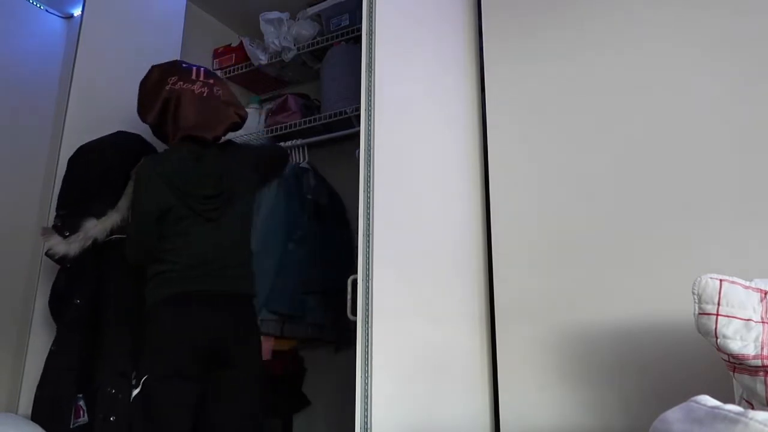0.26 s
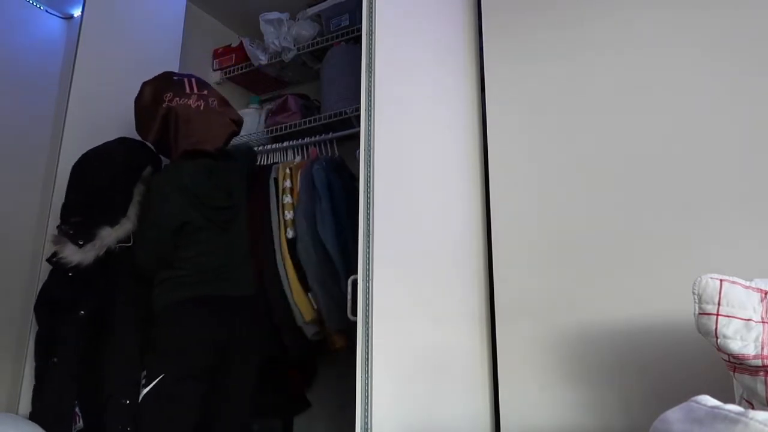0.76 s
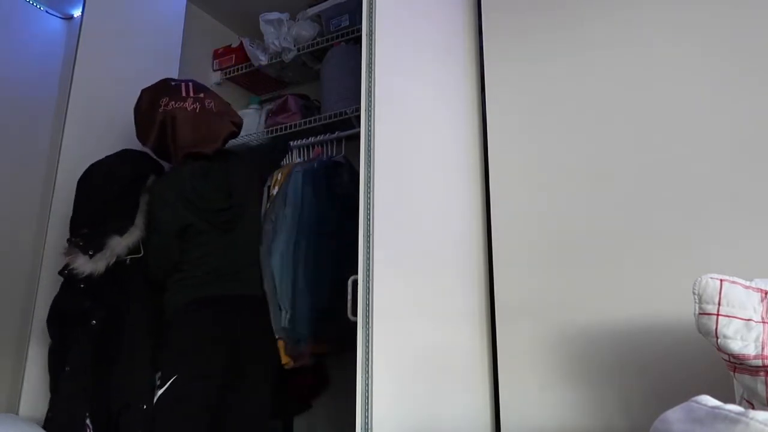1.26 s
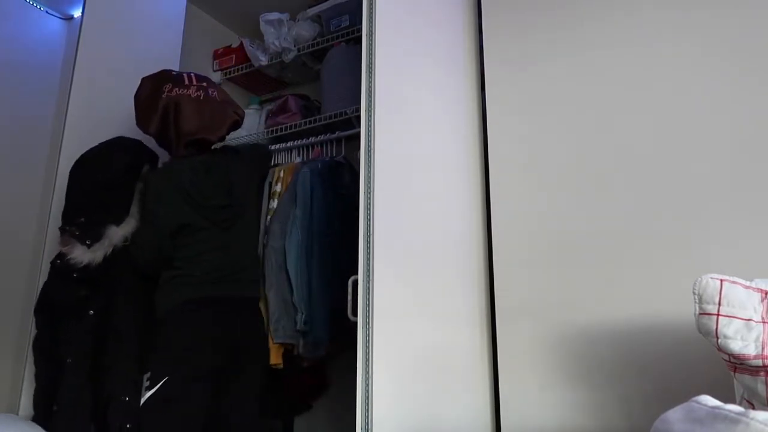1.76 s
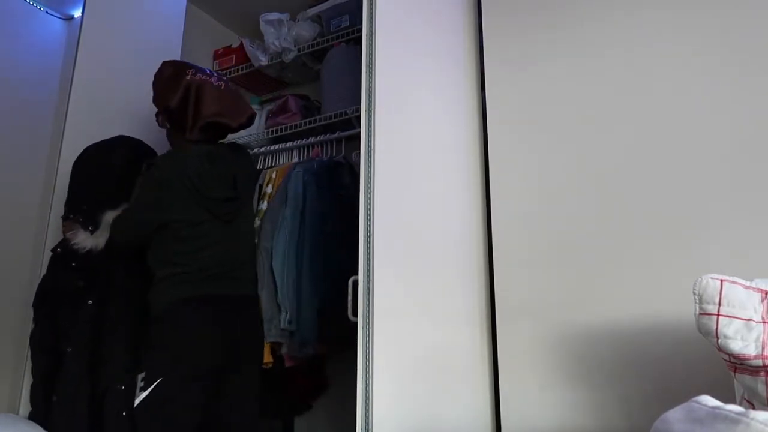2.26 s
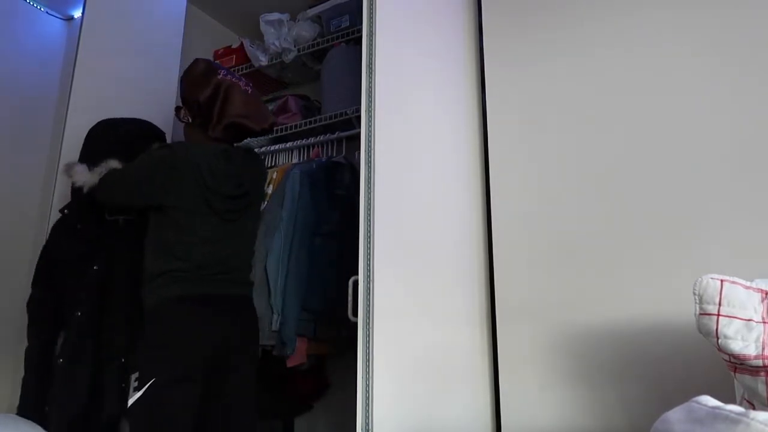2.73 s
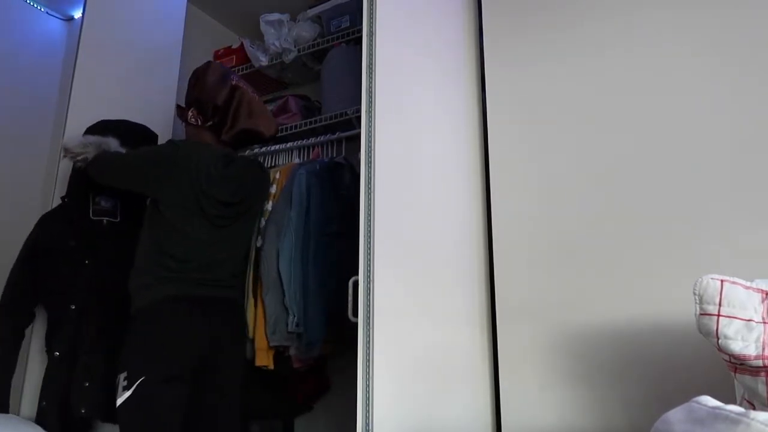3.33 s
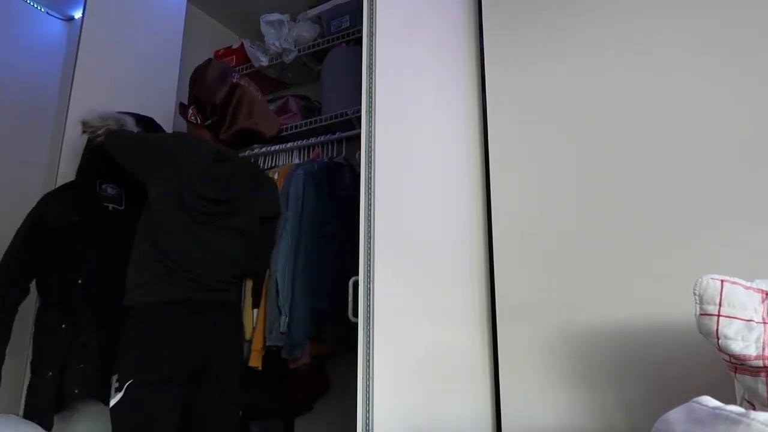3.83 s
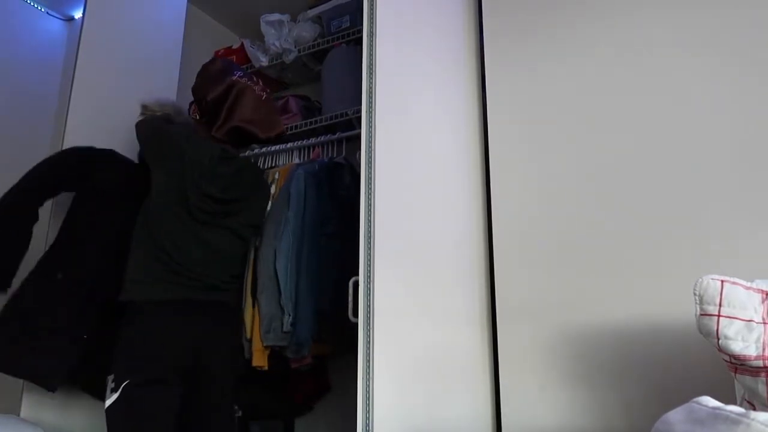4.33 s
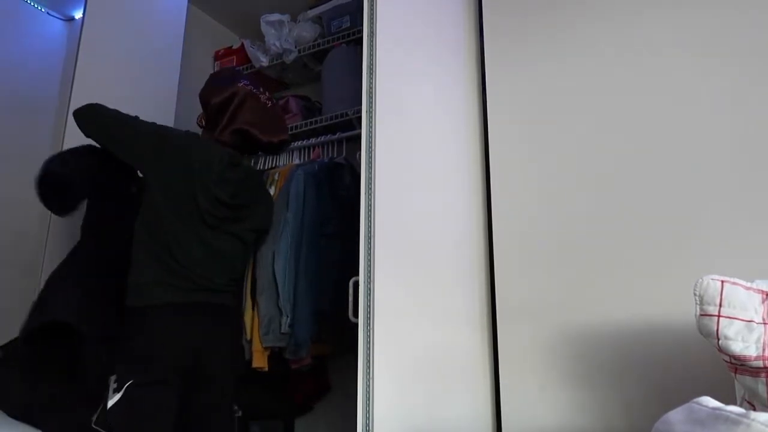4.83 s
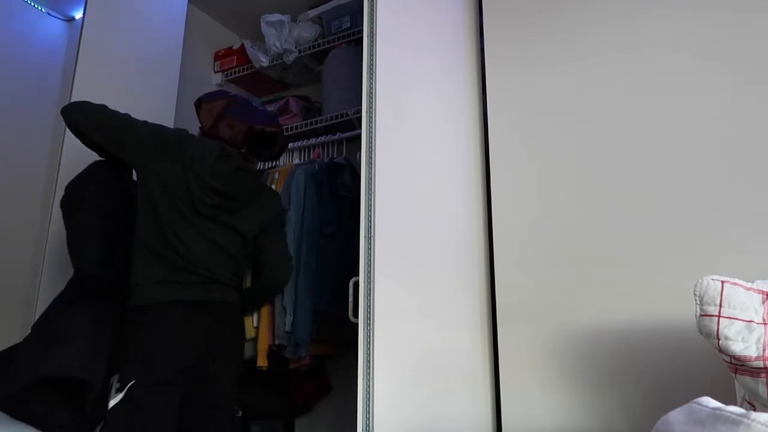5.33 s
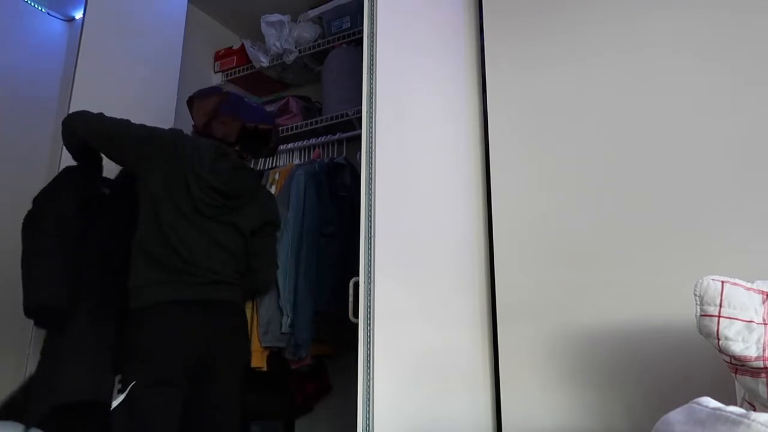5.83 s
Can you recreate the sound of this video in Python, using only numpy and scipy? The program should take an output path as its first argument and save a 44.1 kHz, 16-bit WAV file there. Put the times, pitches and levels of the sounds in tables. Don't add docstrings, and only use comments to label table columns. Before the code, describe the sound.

Heard by a phone a bed's width away, a closet is being rearranged: fabric rustle and dull footsteps, thin hook ticks and short scrapes on wire, then a cluster of sharp plastic and metal hanger clacks that shake the shelf. Quieter garment swishes follow, with a crisp coat hanger rattle, scattered soft knocks and smooth nylon sliding at the end. The room's echo is short and muted.

```python
import sys
import numpy as np
from scipy import signal
from scipy.fft import rfft, irfft, next_fast_len
from scipy.io import wavfile
from scipy.ndimage import uniform_filter1d, map_coordinates

SR = 44100
rng = np.random.default_rng(int(sys.argv[2]) if len(sys.argv) > 2 else 0)


def decibels_to_gain(level_db):
    exponent = np.asarray(level_db, float) / 20
    return 10 ** exponent


def generate_wav(sig):
    pcm = np.round(np.clip(np.atleast_2d(sig).T, -1, 1) * 32767).astype(np.int16)
    wavfile.write(sys.argv[1], SR, pcm)


N = 268392
STEP = 32

# pitch_hz, width_hz, level_db
SHELF_MODES = [(247, 91, -6.5), (378, 43, 6.5), (481, 34, 2.5), (571, 82, -1.5)]
# pitch_hz, width_hz, level_db
HOOK_MODES = [(1844, 160, -5.5), (2030, 20, 3.5), (2250, 270, -8.5), (2450, 38, -6.5), (2680, 96, -8.5),
              (3208, 76, -3.5)]
# pitch_hz, width_hz, level_db
WIRE_MODES = [(4135, 215, -0.5), (4460, 100, -5), (4540, 54, -17)]
# pitch_hz, width_hz, level_db
TIP_MODES = [(5640, 310, 3.5), (6300, 170, 4), (6860, 290, -1)]
# pitch_hz, width_hz, level_db
FRAME_MODES = [(735, 40, 1), (892, 34, 5), (1023, 120, -4), (1290, 200, 4), (1640, 110, 10)]
# pitch_hz, width_hz, level_db
COAT_MODES = [(1438, 40, -8), (1835, 60, -6), (2270, 150, -7), (2620, 90, -5), (3200, 300, -8),
              (3620, 90, -7), (4060, 60, -8), (4400, 170, -10)]
# pitch_hz, width_hz, level_db
FIRST_LOAD_MODES = [(992, 76, -5), (1207, 20, -4), (1587, 16, -3), (1698, 19, -5), (2240, 29, -3.5),
                    (2460, 44, -0.5), (2650, 34, -4), (2913, 54, 1.5), (3070, 100, -10), (3640, 46, -16),
                    (4240, 29, -13), (4400, 29, -14)]
SECOND_LOAD_MODES = [(830, 140, -15), (1240, 14, -7), (1437, 42, -16), (1860, 58, -7.5), (2140, 32, -9),
                     (2435, 35, 1), (2800, 30, -6), (2900, 20, -6), (3350, 28, -19), (3530, 47, -15),
                     (4080, 23, -16), (4400, 90, -19)]
THIRD_LOAD_MODES = [(900, 26, -1.5), (1090, 70, -10.5), (1294, 78, -3.5), (1598, 18, -5), (2033, 210, -0.5),
                    (2530, 15, -2), (2600, 100, -4.5), (2900, 30, -1), (3300, 19, -9), (3530, 47, 2.5),
                    (4070, 63, 2.5), (4600, 26, -5)]

# pitch_hz, level_db (per Hz); first the floor's deepest rumble, from below hearing up to
# about 100 Hz, then the walls, reaching higher
DEEP_COLOUR = [(8.8, -28), (15, 7), (21, -17), (43, 3), (90, 4.5), (120, -40), (200, -120)]
HUM_COLOUR = [(29, -37), (50, -8), (81, -6), (127, 0.5), (248, -4.5), (290, -11), (368, -8.5), (600, -45),
              (780, -17), (1320, -120)]
# pitch_hz, level_db
BRUSH_COLOUR = [(150, -60), (250, -1.5), (357, 2), (773, -3.5), (918, -1.5), (2200, -25.5), (2860, -78),
                (4840, -120)]
# pitch_hz, level_db
SWISH_COLOUR = [(710, -8), (1200, 2), (1480, 1), (2080, 4), (3720, -0.5), (6000, -14), (7800, -18.5),
                (13200, -120)]
# pitch_hz, level_db
HISS_COLOUR = [(2500, -7), (4500, -1), (6000, -1), (8000, -6), (9500, -16.5), (11000, -19), (13000, -57)]
# pitch_hz, level_db
SHEEN_COLOUR = [(8500, -38), (10000, -11), (11500, 1), (13500, -4), (15300, -6), (16000, -60)]
# pitch_hz, level_db
PORT_NOISE_COLOUR = [(18, -52), (30, 2.5), (315, 18), (673, 9.5), (2420, -3.5), (3980, -48), (5890, -36),
                     (7080, -67), (8950, -58), (15500, -61)]
# pitch_hz, level_db
PORT_DIFFERENCE = [(100, -46), (700, -17.5), (2400, -14), (4400, -3), (6500, -1.5), (8000, 1.5),
                   (9500, 12.5), (12000, 5), (15500, 10)]
# pitch_hz, t60_s
BEDROOM_DECAY = [(300, 0.49), (1000, 0.37), (2500, 0.28), (5000, 0.24), (10000, 0.14)]

# peak_s, length_s, hum_db, deep_over_hum_db
FOOTSTEPS = [(0.113, 0.062, -53, -4), (0.305, 0.087, -45.5, -13), (0.476, 0.085, -45, -18),
             (0.717, 0.06, -47, -10), (0.943, 0.057, -46.5, -10), (1.616, 0.039, -49.5, 8),
             (2.125, 0.086, -41.5, -7.5), (2.245, 0.029, -43, -9), (2.744, 0.21, -50.5, -5),
             (2.905, 0.038, -41.5, -6), (3.076, 0.11, -50.5, -1), (3.582, 0.046, -51, -5),
             (4.3, 0.35, -51, -4), (4.832, 0.041, -41, -18), (5.248, .04, -54, -4),
             (5.797, 0.042, -45, -20), (6.0, 0.14, -52, -0.5)]
# peak_s, rise_s, fall_s, swish_db, hiss_over_swish_db
FABRIC_STROKES = [(.15, .3, 0.56, -63, 6.5), (1.62, 0.12, 0.12, -58.5, -1), (3.5, 0.034, 0.061, -50, -15),
                  (5.3, .1, 0.28, -66, -2), (.5, 0.093, 0.2, -60.5, 8.5), (.65, 0.1, 0.078, -45, -6),
                  (.82, 0.092, 0.056, -50, 5.5), (1.36, .08, 0.11, -68, -30),
                  (1.85, 0.24, 0.051, -51.5, -4.5), (2.129, 0.083, 0.057, -42, 0.5),
                  (2.312, 0.089, 0.099, -37.5, -19), (2.64, 0.046, 0.21, -47.5, 6),
                  (2.78, 0.27, 0.3, -41, -19), (2.98, 0.18, 0.059, -40.5, -15),
                  (3.78, 0.16, 0.069, -53.5, -2), (4.12, 0.28, 0.26, -48, -2), (4.36, 0.2, 0.22, -45.5, -8),
                  (4.74, .1, .05, -49, -7), (4.59, 0.05, 0.05, -46, -22), (5.0, 0.21, 0.28, -46.5, -4.5),
                  (5.52, 0.06, 0.1, -50, -10), (5.97, 0.28, 0.2, -41, -2.5)]
# peak_s, rise_s, fall_s, level_db
NYLON_STROKES = [(.1, .15, .12, -76), (.5, 0.092, 0.11, -62), (1.0, .1, .1, -77), (1.4, 0.076, .15, -82),
                 (1.85, 0.23, 0.13, -73), (2.45, .04, 0.035, -70), (2.67, .05, 0.068, -70),
                 (2.92, .02, .03, -67), (3.62, .04, .04, -71), (3.74, 0.055, .1, -68),
                 (4.05, .12, 0.1, -66), (4.4, 0.13, 0.11, -61.5), (4.72, .1, .06, -71.5),
                 (4.82, 0.022, 0.027, -63), (4.95, .05, .04, -68), (5.12, .07, .07, -68),
                 (5.45, 0.12, 0.11, -71), (5.8, 0.069, 0.14, -58), (6.0, 0.16, 0.14, -54.5)]
# start_s, level_db, thud_db, hollow_db, snap_db
SHORT_BLOWS = [(0.6947, -41, -4, 4, -2), (1.5913, -35, -38, -8, -4), (2.0834, -17.5, -9.5, -9, -8),
               (2.099, -27, -0.5, -11, -7), (2.2345, -17, -18, -12, -12), (2.2368, -1.5, -24, -3, -5),
               (2.2405, -10, -23, -8, -29), (2.6852, -8, -20, -18, -10), (2.688, -8, -18, -20, -13),
               (2.8912, -14, -8, -10, -20), (2.893, -7.5, -5.5, -0.5, -10), (2.9036, -4, -18.5, -23, 0),
               (2.9073, -6, -14, -13, -21), (3.711, -35, -17, -3, -6), (3.715, -31.5, -15, -2, -6),
               (3.7265, -30, -21, -8, -11), (3.731, -29.5, -15, 0, -13), (3.742, -38, -12, -8, -20),
               (4.8957, -23, -20, -5, -7), (4.906, -26, -20, -6, -15), (4.93, -25.5, -17, -8, -6),
               (4.997, -27.5, -12.5, -3.5, -3.5), (5.504, -41, -1, 1.5, -27), (5.6267, -38, -13, -21, 1),
               (5.8556, -33.5, -11, 1, -6), (5.9384, -32, -11, -20, -2), (6.0784, -26.5, -10, 2, -2)]
# start_s, level_db, thud_db, hollow_db, t60_s
SHOVE_BLOWS = [(2.0278, -44, 7.5, 7.5, 0.2), (2.1182, -22.5, -19, -33, 0.029), (2.2465, -15, -8, -10, 0.1),
               (2.2615, -18, -9, -14, 0.15), (2.587, -26, -14, -1, 0.058), (2.916, -15, -12.5, -8, 0.065),
               (2.943, -21.5, -8, -7, 0.072), (2.925, -24.5, 1.5, -23, 0.033), (3.103, -31, 0.5, -1, 0.26),
               (3.148, -30, -8, -10, .08), (3.132, -30, -6, -0.5, 0.084), (3.467, -37, -10, -3, 0.04),
               (3.5798, -34, -35, -4.5, 0.12), (4.338, -35, -8.5, -5, 0.041), (4.554, -37.5, -7, -1, 0.33),
               (4.801, -23.5, -11.5, -2.5, 0.084), (4.814, -24.5, -32, -4.5, 0.08),
               (4.888, -22, -16, -4, 0.06), (4.9167, -26, -16, -14, 0.083), (4.951, -47, -20, 3, 0.034),
               (5.5833, -36.5, -0.5, -16, 0.07)]
# start_s, level_db, hollow_db, snap_db, pitch_hz
COAT_CLACKS = [(3.772, -36, -20, 0, 3000), (3.778, -32.5, -20, 1, 3330), (4.1682, -18, -7, -15, 2900),
               (4.174, -11.5, -13, -4.5, 2750), (4.1802, -13, -17, -8, 3250),
               (4.189, -18.5, -6.5, -12, 2650), (4.201, -26, -12, -2, 2600), (4.209, -30, -5, -6, 2290),
               (4.222, -26, -22, -10, 2230), (5.1467, -20.5, -19, -17, 2400),
               (5.152, -19, -15.5, -18, 2720), (5.1605, -19, -24, -6, 3240), (5.171, -20, -12, -13, 2550),
               (5.19, -29.5, -7, -6, 2300)]
# start_s, end_s
LOADED_SPANS = [
    (2.22, 2.3),
    (2.66, 2.72),
    (2.88, 2.95),
]
# start_s, level_db, wire_ring_db, pitch_hz, t60_s
HOOK_TAPS = [(1.1385, -27, -17, 1860, 0.02), (1.149, -33, -10, 1800, 0.023), (1.16, -25, -10, 2000, .02),
             (1.1657, -15, -9.5, 2330, 0.036), (1.4197, -31.5, -19.5, 2040, 0.036),
             (1.5604, -28, -6, 2475, 0.039), (1.7754, -27, -15.5, 2700, 0.023),
             (1.8885, -27, -15, 2270, 0.025), (1.9644, -22.5, -11, 2240, 0.017),
             (2.4324, -28.5, -18, 2270, 0.052), (2.4673, -28.5, -8, 2270, 0.0098),
             (2.4877, -42, -5, 2180, 0.054), (3.325, -41, -21, 2150, 0.038), (3.6614, -34, -7, 1980, .045)]
# start_s, level_db, wire_ring_db, pitch_hz, t60_s
HOOK_RATTLES = [(1.128, -34, -11, 1830, 0.076), (1.1914, -25.5, -13, 2380, 0.077),
                (1.205, -26.5, -13, 2220, 0.046), (1.224, -31, -15, 2000, 0.056),
                (1.331, -25.5, -6.5, 2480, 0.025), (1.3395, -30, -6, 2480, 0.057),
                (1.3494, -31.5, -4, 2450, 0.094), (1.4765, -28, 0, 2530, 0.08),
                (1.7928, -27, -2, 2680, 0.058), (1.8287, -27.5, -7, 2140, 0.054),
                (1.8474, -33, -10, 2140, 0.039), (2.7694, -24, -8, 2480, 0.093),
                (2.7975, -23.5, -11.5, 2510, 0.15)]
# peak_s, rise_s, fall_s, level_db
WIRE_DRAGS = [
    (1.166, 0.068, 0.039, -46),
    (1.372, 0.11, 0.14, -45),
    (1.81, 0.041, 0.13, -41.5),
    (2.72, .02, 0.14, -35.5),
    (3.03, 0.021, 0.059, -41),
    (3.149, 0.031, 0.059, -40),
    (4.05, 0.18, 0.012, -47),
]


def unit(x):
    return x / np.sqrt(np.mean(x ** 2) + 1e-20)


def along(points, hz):
    f, v = np.transpose(points)
    return np.interp(np.log(hz + 1), np.log(f + 1), v)


def wobble(rate_hz):
    knots = rng.standard_normal(int(N * rate_hz / SR) + 4)
    return map_coordinates(knots, [np.arange(N) * rate_hz / SR])


def filtered(x, response):
    n = x.shape[-1]
    m = next_fast_len(n + SR // 8)
    return irfft(rfft(x, m) * response(np.fft.rfftfreq(m, 1 / SR)), m)[..., :n]


def modes(table, f, widen):
    total = 0
    for k, (hz, width, db) in enumerate(table):
        damping = 1j * f * width * widen
        total = total + (-1) ** k * decibels_to_gain(db) * damping / (hz * hz - f * f + damping)
    return total


def varied(table, spread_db):
    return [(hz, width, db + spread_db * rng.standard_normal()) for hz, width, db in table]


def cut(f, low_hz, high_hz):
    rise, fall = 1j * f / low_hz, 1j * f / high_hz
    highpass = rise ** 2 / (1 + 1.4 * rise + rise ** 2)
    return (highpass / (1 + 1.4 * fall + fall ** 2)) ** 2


def grit(shape, spiky_db):
    sizes_db = spiky_db * np.minimum(rng.exponential(size=shape), 4)
    return unit(rng.standard_normal(shape) * decibels_to_gain(sizes_db))


def rush(colour, patchy_db, spiky_db):
    z = signal.stft(grit((2, N), spiky_db), nperseg=512)[2]
    patches = uniform_filter1d(rng.standard_normal(z.shape[1:]), size=6, axis=0)
    patches = unit(uniform_filter1d(patches, size=8, axis=1))
    pair = signal.istft(z * decibels_to_gain(patchy_db * patches), nperseg=512)[1][:, :N]
    return unit(filtered(pair, lambda hz: decibels_to_gain(along(colour, hz))))


def fine(gain):
    return np.interp(np.arange(N), np.arange(0, N, STEP), gain)


def swell(peak_s, rise_s, fall_s):
    from_peak_s = np.arange(0, N, STEP) / SR - peak_s
    return np.exp(-(from_peak_s / np.where(from_peak_s < 0, rise_s, fall_s)) ** 2)


def swells(rest_db, shapes, levels_db):
    hush_db = -6.5 * swell(2.75, 0.57, 1)
    rest = decibels_to_gain(rest_db + hush_db)
    return fine(np.sqrt(rest ** 2 + decibels_to_gain(levels_db) ** 2 @ shapes ** 2))


def house():
    shapes = np.array([swell(s, length, length) for s, length, _, _ in FOOTSTEPS])
    hum_db, deeper_db = np.transpose(FOOTSTEPS)[2:]
    deep_gain = swells(-58.5, shapes, hum_db + deeper_db)
    deep = deep_gain * rush(DEEP_COLOUR, patchy_db=1.8, spiky_db=-3.0)
    hum_gain = swells(-51, shapes, hum_db) * decibels_to_gain(1.13 * wobble(25))
    return deep + hum_gain * rush(HUM_COLOUR, patchy_db=0.0, spiky_db=1.6)


def cloth():
    shapes = np.array([swell(*row[:3]) for row in FABRIC_STROKES])
    swish_db, bright_db = np.transpose(FABRIC_STROKES)[3:]
    brush_db = swish_db - 8.5 - 0.1 * bright_db
    brush = swells(-55.5, shapes, brush_db) * rush(BRUSH_COLOUR, patchy_db=.7, spiky_db=2.5)
    swish = swells(-52.5, shapes, swish_db) * rush(SWISH_COLOUR, patchy_db=.7, spiky_db=2.5)
    hiss = swells(-62.5, shapes, swish_db + bright_db) * rush(HISS_COLOUR, patchy_db=.7, spiky_db=2.5)
    nylon_shapes = np.array([swell(*row[:3]) for row in NYLON_STROKES])
    sheen_gain = swells(-76, nylon_shapes, np.transpose(NYLON_STROKES)[3])
    sheen = sheen_gain * rush(SHEEN_COLOUR, patchy_db=1.5, spiky_db=2.0)
    return decibels_to_gain(.9 * wobble(14)) * (brush + swish + hiss + sheen)


def room(x, wet_db):
    hz, t, z = signal.stft(rng.standard_normal((2, SR * 2 // 5)), SR, nperseg=256)
    decay_db = -60 * t / along(BEDROOM_DECAY, hz)[:, None]
    tail = signal.istft(z * decibels_to_gain(decay_db), SR, nperseg=256)[1]
    tail *= 1 - np.exp(-np.arange(tail.shape[1]) / SR / 0.00054)
    echo = signal.fftconvolve(x[None], tail / np.linalg.norm(tail[0]), axes=1)[:, :len(x)]
    return x * np.array([[1], [.2]]) + decibels_to_gain(wet_db) * echo


def strike(db, t60, parts, wet_db):
    t = np.arange(SR // 2) / SR
    t60 = max(t60, .005)
    bounces = np.repeat(rng.standard_normal(len(t) // 63), 63)
    bounces = bounces * (1 - np.exp(-(t / .008) ** 2))
    rise_s = 0.0006 + .00004 * abs(db) + 0.025 * max(t60 - 0.071, 0)
    chatter = grit(len(t), spiky_db=1.0) * decibels_to_gain(4.4 * bounces)
    chatter = chatter * (1 - np.exp(-t / rise_s)) ** 2
    chatter = chatter * (1 + 0.42 * np.exp(-t / 0.0069))
    n = min(len(t), int(SR * (1.4 * t60 + .12)))
    dry = np.zeros(n)
    for part_db, life, response in parts:
        ring = filtered((chatter * decibels_to_gain(-60 * t / t60 / life))[:n], response)
        dry += decibels_to_gain(part_db) * ring / np.abs(ring).max()
    echo_space = min(len(t) - n, SR // 8)
    return decibels_to_gain(db) * room(np.pad(dry, (0, echo_space)), wet_db)


def add(out, s, x):
    at = round((s - .002) * SR)
    out[:, at:at + x.shape[1]] += x


def knocks(rows, hanger, ring_db, low_hz, high_hz, top_hz, wet_db):
    out = np.zeros((2, N + SR))
    for s, db, thud_db, hollow_db, snap_db, t60, *ring_hz in rows:
        body, frame, shelf = (varied(table, 1.5) for table in (hanger, FRAME_MODES, SHELF_MODES))
        body += [(hz, 110, 3) for hz in ring_hz]

        def clack(f):
            ring = decibels_to_gain(ring_db) * modes(body, f, 0.99) + 0.74
            return ring * cut(f, low_hz, high_hz) * cut(f, 494, top_hz)

        parts = [(0, 1, clack),
                 (snap_db, .6, lambda f: (modes(WIRE_MODES, f, 0.91) + 0.81) * cut(f, 1.066 * high_hz, 3800)),
                 (hollow_db, 1.2, lambda f: (modes(frame, f, 1) + .5) * cut(f, 600, 1900)),
                 (thud_db, 1.4, lambda f: modes(shelf, f, 0.98) * cut(f, 104, 1500))]
        add(out, s, strike(db + 0.5, t60, parts, wet_db))
    return out[:, :N]


def taps(rows, tip_db):
    out = np.zeros((2, N + SR))
    for s, db, wire_db, hz, t60 in rows:
        hook = varied(HOOK_MODES, 2.5) + [(hz, 130, 2)]
        wire = varied(WIRE_MODES + [(3960, 51, -4.0)], 3.1)
        parts = [(0, 1, lambda f: (modes(hook, f, 0.55) + 0.16) * cut(f, 2400, 2800)),
                 (wire_db, 1, lambda f: modes(wire, f, 0.95) * cut(f, 3700, 5000)),
                 (wire_db + tip_db, .7, lambda f: modes(TIP_MODES, f, 0.99) * cut(f, 4500, 11000))]
        add(out, s, strike(db, t60, parts, wet_db=-6))
    return out[:, :N]


def hangers():
    blows = [(*row, 0.025) for row in SHORT_BLOWS]
    for s, db, thud_db, hollow_db, t60 in SHOVE_BLOWS:
        snap_db = -18.5 - 0.54 * (thud_db + 6)
        blows.append((s, db, thud_db, hollow_db, snap_db, t60))
    coat = [(s, db, -21, hollow_db, snap_db, 0.016, hz) for s, db, hollow_db, snap_db, hz in COAT_CLACKS]
    hard = [[row for row in blows if start < row[0] < end] for start, end in LOADED_SPANS]
    light = [row for row in blows if row not in sum(hard, [])]

    out = knocks(light, HOOK_MODES, ring_db=2.7, low_hz=1450, high_hz=3520, top_hz=4770, wet_db=-4.5)
    for rows, body in zip(hard, (FIRST_LOAD_MODES, SECOND_LOAD_MODES, THIRD_LOAD_MODES)):
        out += knocks(rows, body, ring_db=11, low_hz=910, high_hz=3750, top_hz=5100, wet_db=-6.0)
    out += knocks(coat, COAT_MODES, ring_db=7.5, low_hz=1440, high_hz=4100, top_hz=4500, wet_db=-2.5)
    return out + taps(HOOK_TAPS, tip_db=5.5) + taps(HOOK_RATTLES, tip_db=-26)


def slides():
    drag = fine(sum(decibels_to_gain(db) * swell(s, rise, fall) for s, rise, fall, db in WIRE_DRAGS))
    slips = grit(N, spiky_db=2.5) * decibels_to_gain(3 * wobble(60))

    def metal(f):
        wire = decibels_to_gain(-2.5) * modes(WIRE_MODES, f, 0.12)
        tip = decibels_to_gain(-28.0) * modes(TIP_MODES, f, 0.33)
        return (0.077 + modes(HOOK_MODES, f, 0.47) + wire + tip) * cut(f, 1100, 3330)

    return room(decibels_to_gain(-0.5) * drag * unit(filtered(slips, metal)), wet_db=-10.0)


def scene():
    mid, scattered = house() + cloth() + hangers() + slides()

    def left_lead(hz):
        return .5j * decibels_to_gain(along(PORT_DIFFERENCE, hz)) * np.minimum(hz / 6000, 1) ** 2 + .015

    side = filtered(mid, left_lead)
    side += filtered(scattered, lambda hz: .75 * decibels_to_gain(along(PORT_DIFFERENCE, hz)))
    side += decibels_to_gain(-56.0) * rush(PORT_NOISE_COLOUR, patchy_db=4.0, spiky_db=3.0)[0]
    return np.array([mid + side, mid - side])


def roll_off(x):
    return signal.sosfilt(signal.butter(12, 15680, fs=SR, output="sos"), x)


def record(dry):
    held = dry / (1 + np.abs(dry / 1.05) ** 8) ** (1 / 8)
    held = filtered(held, lambda hz: hz < 15700)
    return roll_off(held)


dry = scene()
out = record(dry)
generate_wav(out)
```